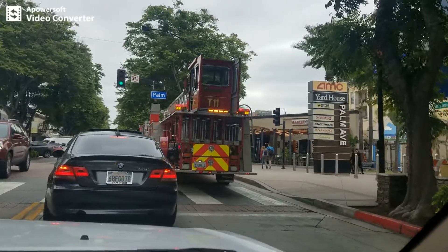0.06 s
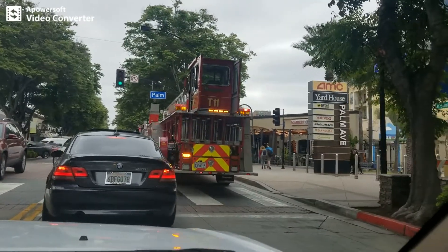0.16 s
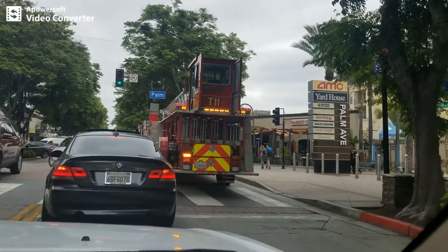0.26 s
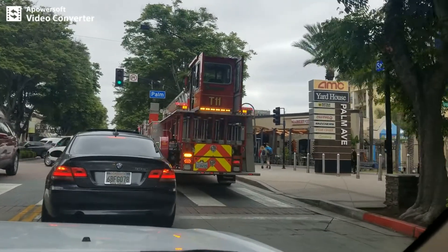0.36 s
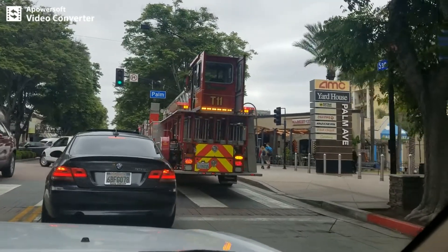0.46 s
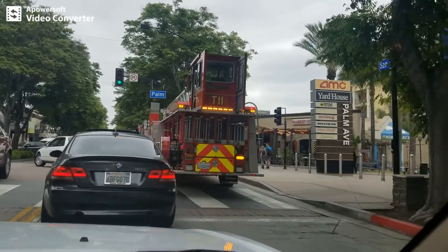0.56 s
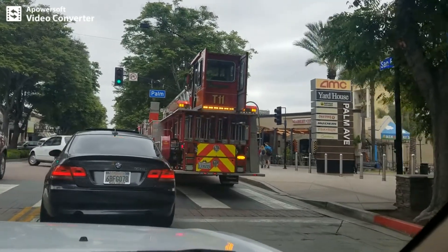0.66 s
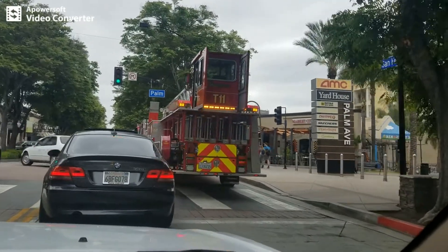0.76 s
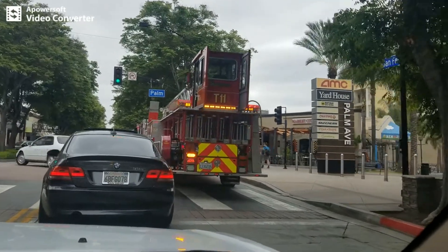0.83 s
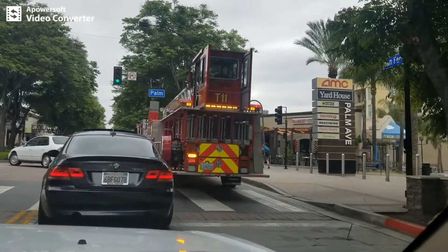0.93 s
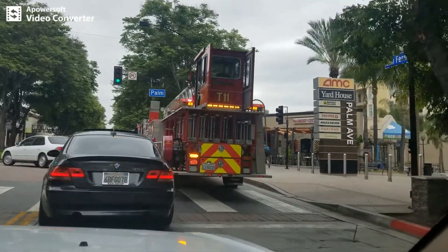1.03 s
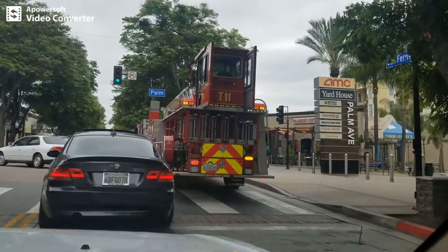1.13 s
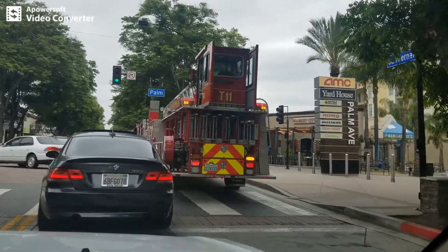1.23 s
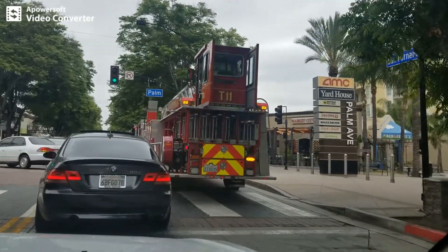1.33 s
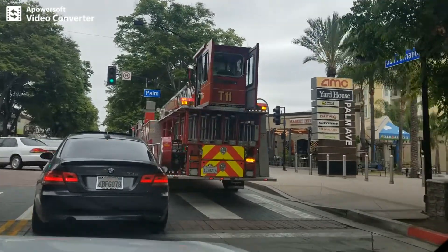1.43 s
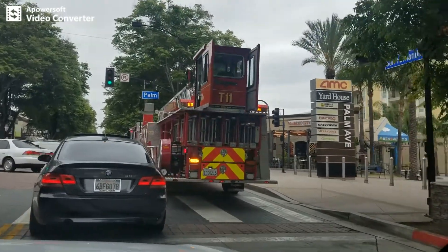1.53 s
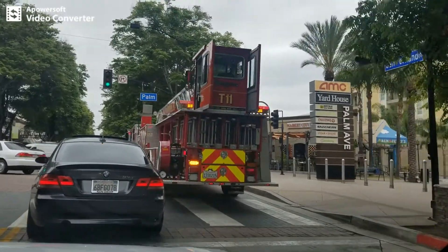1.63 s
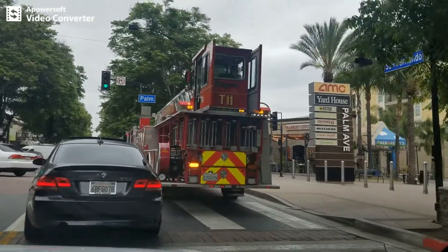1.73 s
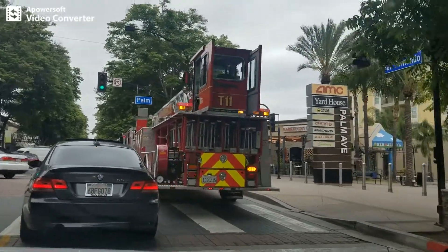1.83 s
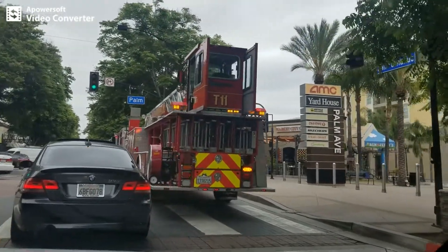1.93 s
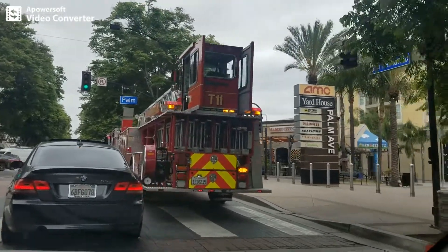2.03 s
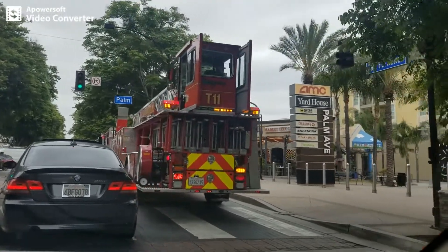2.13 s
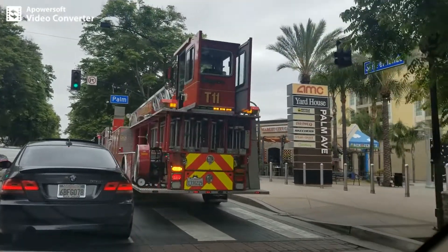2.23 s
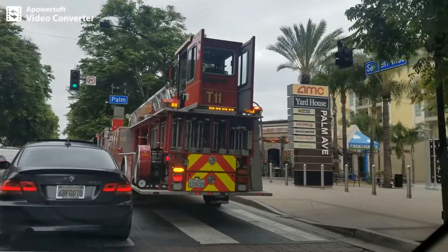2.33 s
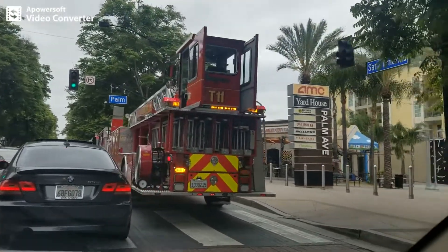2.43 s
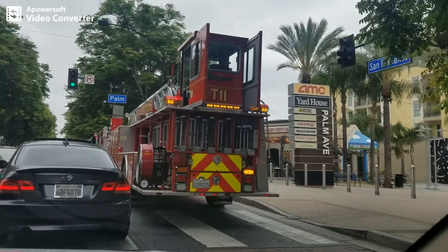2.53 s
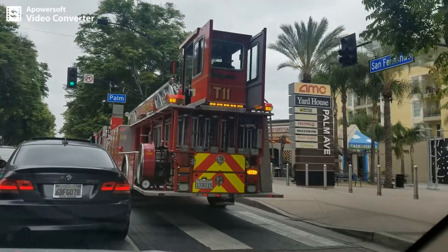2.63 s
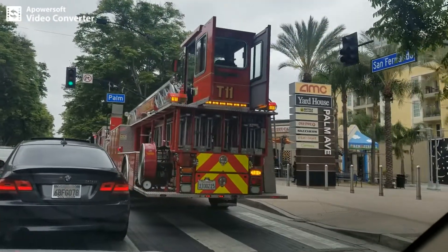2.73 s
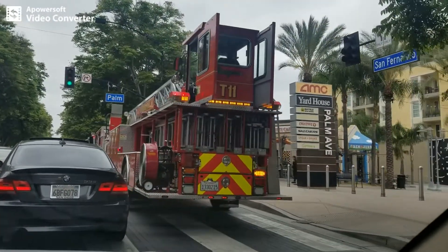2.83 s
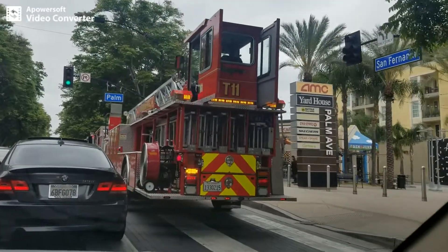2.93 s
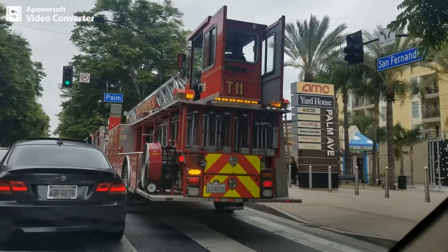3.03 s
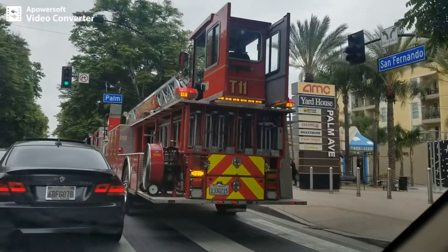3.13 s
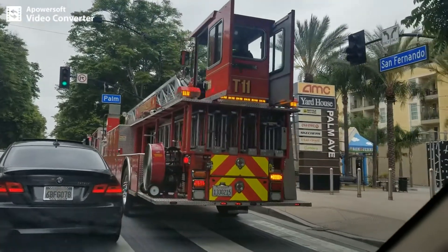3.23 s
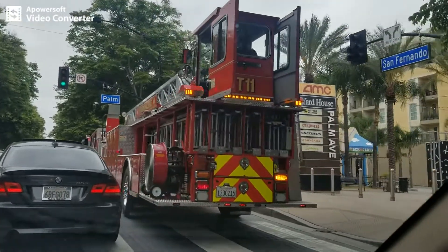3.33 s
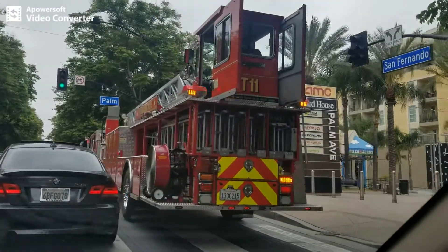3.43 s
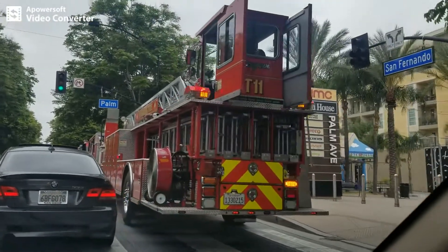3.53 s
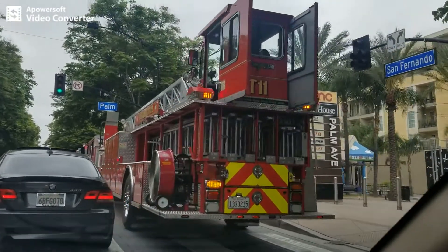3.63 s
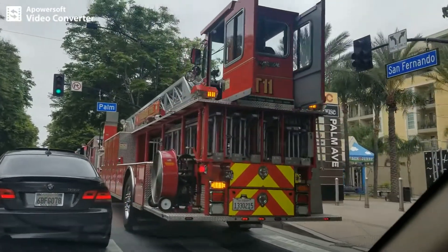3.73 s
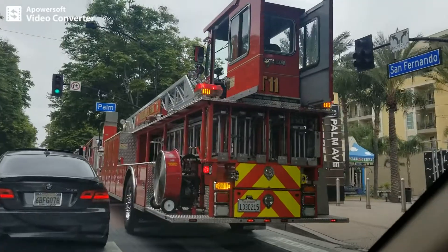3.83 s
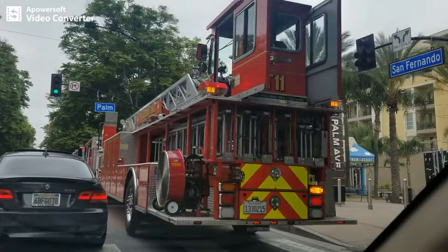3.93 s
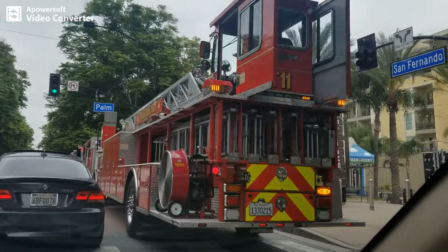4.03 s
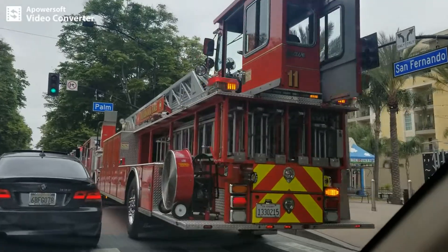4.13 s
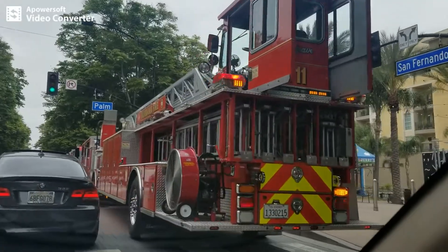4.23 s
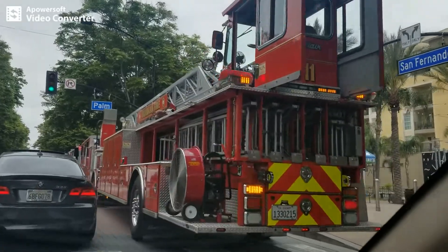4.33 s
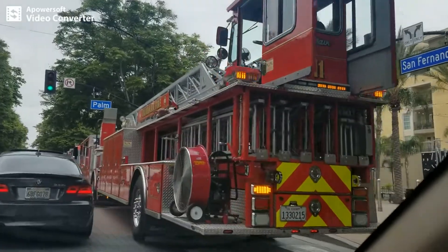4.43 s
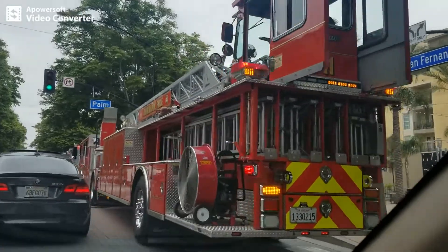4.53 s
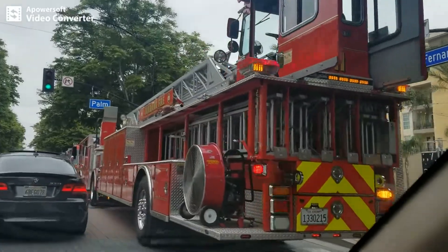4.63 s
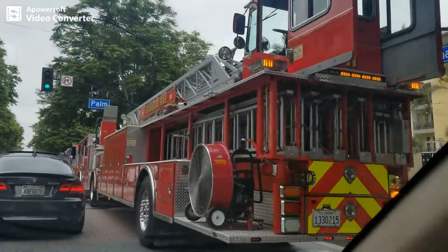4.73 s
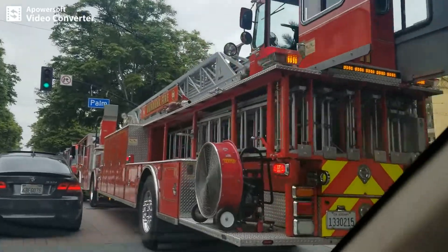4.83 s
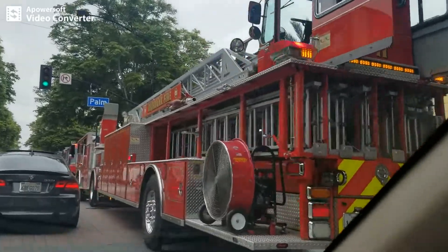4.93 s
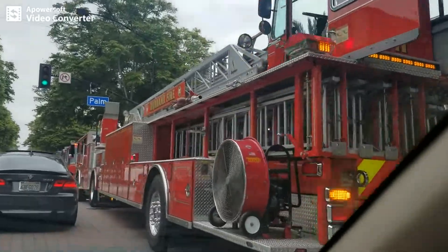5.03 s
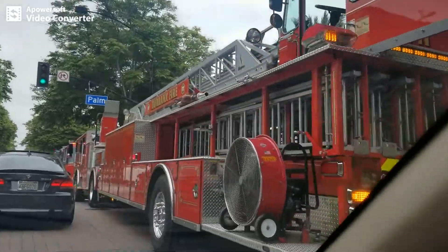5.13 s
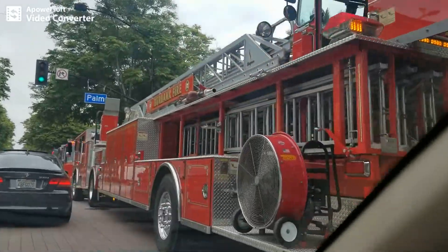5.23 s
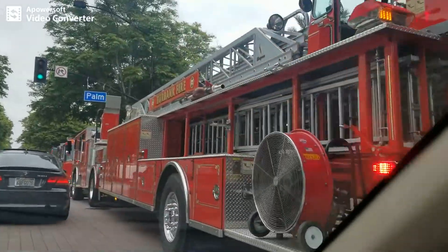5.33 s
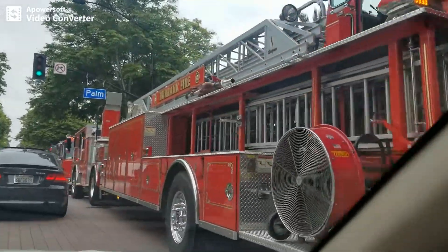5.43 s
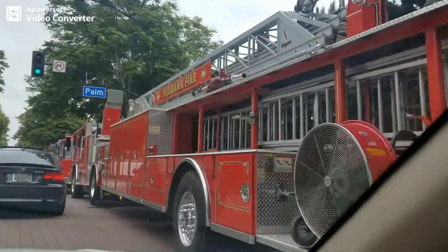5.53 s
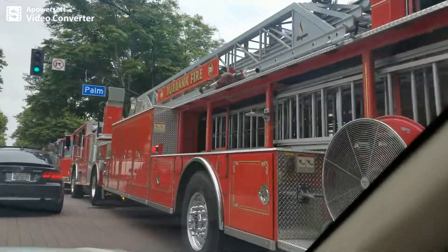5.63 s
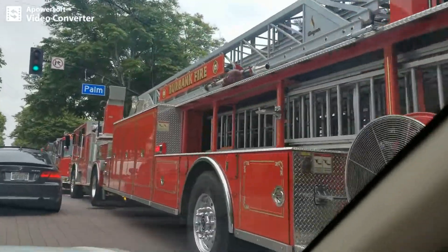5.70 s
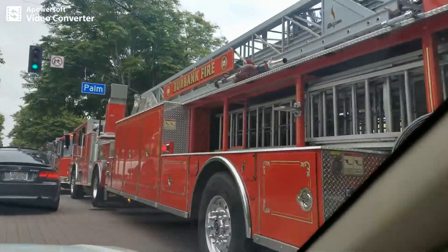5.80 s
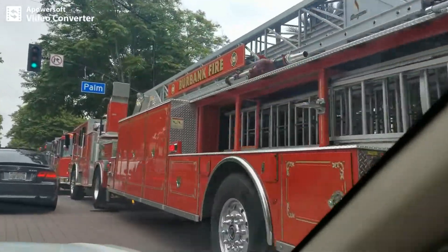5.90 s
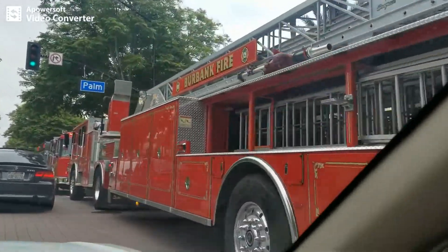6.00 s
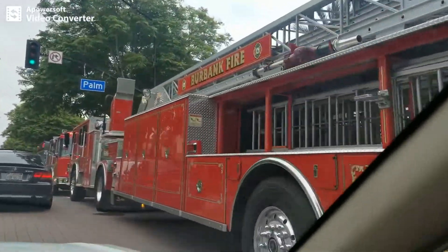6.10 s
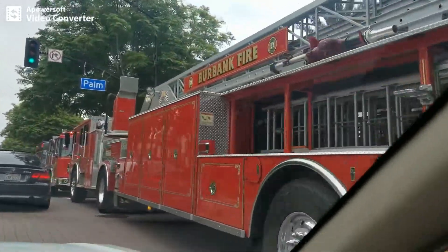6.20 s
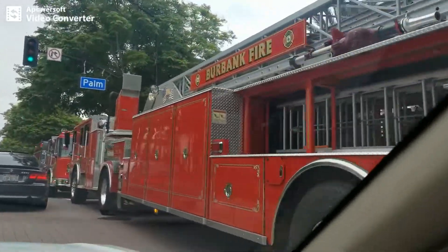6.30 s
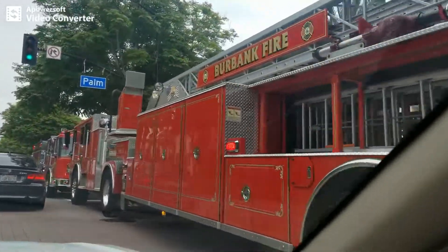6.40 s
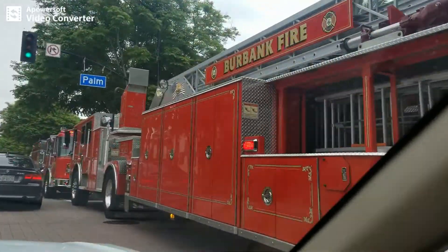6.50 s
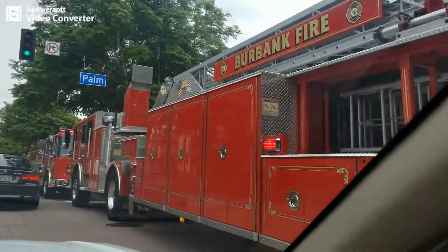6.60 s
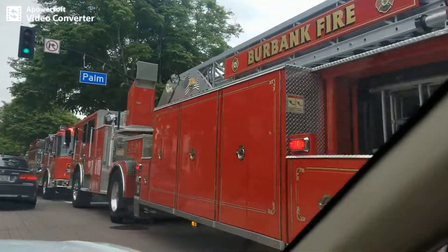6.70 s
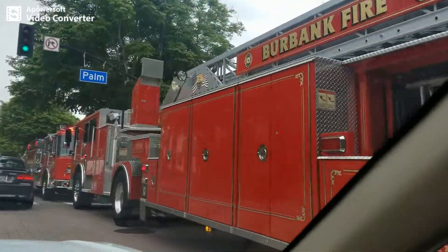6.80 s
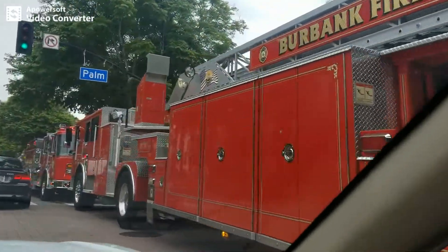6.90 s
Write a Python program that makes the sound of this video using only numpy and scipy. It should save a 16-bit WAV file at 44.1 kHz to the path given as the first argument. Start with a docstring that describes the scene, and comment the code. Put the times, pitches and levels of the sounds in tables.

```python
"""A fire truck's diesel idles ahead beside a steady hum, then pulls away with rising pitch, heard in a car.
The truck is a stack of sine orders locked to its firing rate, shaped by the closed cabin.
The car follows, its own engine a wavering tone that booms over coloured noise for road and vents.
Something loose knocks at bumps: noise bursts with decaying modes. Short noise clicks make taps and ticks."""
import sys
import numpy as np
from scipy import signal
from scipy.fft import rfft, irfft
from scipy.io import wavfile

SR = 44100
rng = np.random.default_rng(int(sys.argv[2]) if len(sys.argv) > 2 else 0)


def unload_audio(sound):
    """Save the sound as a 16-bit wav file, at the path given as the first command line argument."""
    columns = np.transpose(np.atleast_2d(sound))
    # keep every value between -1 and 1, then stretch to whole-number steps
    steps = np.round(np.clip(columns, -1, 1) * 32767)
    wavfile.write(sys.argv[1], SR, steps.astype(np.int16))


N = 306936
TIME = np.arange(N) / SR


def amp(db):
    """Decibels to gain."""
    return 10 ** (np.asarray(db) / 20)


def unit(x):
    """Scales to rms 1."""
    return x / np.sqrt(np.mean(x ** 2) + 1e-20)


def curves(rows):
    """Draws each column of a table as straight lines over time."""
    s, *columns = np.transpose(rows)
    return [np.interp(TIME, s, column) for column in columns]


def swells(rows):
    """Adds up bell-shaped rises in dB, one curve for each level column."""
    return sum(np.outer(db, np.exp(-((TIME - s) / width) ** 2)) for s, width, *db in rows)


def read(points, hz):
    """Reads a spectrum on a log-frequency axis."""
    f, value = np.transpose(points)
    return np.interp(np.log(hz + 1), np.log(f + 1), value)


def add(mix, s, sound):
    """Mixes a stereo sound in at time s."""
    part = mix[:, round(s * SR):][:, :sound.shape[1]]
    part += sound[:, :part.shape[1]]


def wander(rate_hz):
    """Slow random drift of rms 1: noise with little left above the given rate."""
    hz = np.fft.rfftfreq(N, 1 / SR)
    spectrum = rfft(rng.standard_normal(N)) / (1 + (hz / rate_hz) ** 4)
    return unit(irfft(spectrum, N))


def pan(db):
    """Left and right gains for a level difference."""
    return amp(np.array([[.5], [-.5]]) * db)


# Stereo balance of the two microphone ports. Each row: frequency in Hz, left minus right in dB.
BALANCE = [(60, -1.5), (110, -1), (200, -3), (380, -2.5), (700, 5), (1290, -1.5), (2380, 6.5), (4400, 7),
           (8120, -6), (15000, 3)]
# Stereo phase. Each row: frequency in Hz, lead of the left port in radians.
LEFT_LEAD = [(20, 0), (120, .25), (260, .45), (520, 1.3), (780, 1.6), (1210, 2.9), (1980, 5.5), (3700, 8.8),
             (5600, 16.4), (6400, 18.85)]


def ports(hz):
    """Complex gain of each port: a level and phase difference that depends on frequency."""
    return pan(read(BALANCE, hz)) * np.exp(np.array([[.5j], [-.5j]]) * read(LEFT_LEAD, hz))


def tone(turns, hz):
    """A sine as the two ports hear it; turns is its phase in cycles."""
    return np.sqrt(2) * (np.exp(2j * np.pi * turns) * ports(hz)).imag


# Stereo width of noise. Each row: frequency in Hz, likeness of the ports (1 is alike, 0 unrelated).
LIKENESS_BY_HZ = [(60, .99), (130, .98), (290, .85), (640, .5), (1400, .5), (3100, .3), (6800, .2),
                  (11000, .8), (15000, .85)]


def noise(colour, size=N):
    """Coloured noise of rms 1: a shared and an opposed part set how alike the ports are."""
    hz = np.fft.rfftfreq(size, 1 / SR)
    a, b = rfft(rng.standard_normal((2, size)))
    same = np.clip(read(LIKENESS_BY_HZ, hz), -1, 1)
    mid = a * np.sqrt(1 + same)
    side = b * np.sqrt(1 - same)
    stereo = np.array([mid + side, mid - side]) * ports(hz)
    return unit(irfft(stereo * amp(read(colour, hz)), size))


def drone(hz, db, waver_db, jitter, partials=((1, 0),)):
    """A running machine's tone: harmonic sines whose pitch and level waver together."""
    turns = np.cumsum(hz * (1 + jitter * wander(8.6))) / SR
    level = amp(db + waver_db * wander(35))
    return level * sum(amp(part_db) * tone(k * turns, k * hz) for k, part_db in partials)


# Colours of the broad hiss and the fine fizz. Each row: frequency in Hz, relative density in dB per Hz.
HISS_COLOUR = [(410, -29), (700, -3), (774, -6.5), (1100, 0), (1380, -9), (1460, -5.5), (2010, -6.5),
               (2630, -15.5), (3110, -13), (3670, -16), (4640, -16), (5730, -25), (7410, -46),
               (9150, -62.5), (10000, -43.5), (13000, -67), (22000, -120)]
FIZZ_COLOUR = [(4000, -11), (6000, -6.5), (7500, -4.5), (8500, -17.5), (10000, -12.5), (11200, -4.5),
               (12400, -1.5), (13500, -2.5), (15700, -8)]
# Swells and puffs of air. Each row: centre in seconds, width to 1/e in seconds, hiss rise in dB,
# fizz rise in dB.
AIR_SWELLS = [(0, 0.26, 1.5, 1), (2.5, .68, 3.5, 6.5), (5.35, 0.2, 1, 6), (5.7, 0.78, 3.5, 2.5),
              (5.71, .04, 3.5, 3.5), (6.93, 0.1006, 4.5, 4)]


def air(hiss_db=-60.5, fizz_db=-75, fizz_fall_db_per_s=0.86, flicker_db=0.7):
    """Vents and street hiss as noise, with a fizz on top that slowly fades; both flicker together."""
    hiss_rise, fizz_rise = swells(AIR_SWELLS) + flicker_db * wander(37)
    hiss = amp(hiss_db + hiss_rise) * noise(HISS_COLOUR)
    fizz = amp(fizz_db + fizz_rise - fizz_fall_db_per_s * TIME) * noise(FIZZ_COLOUR)
    return hiss + fizz


# The car gathers speed. Each row: time in seconds, rolling effort in dB.
ROLLING = [(0, -5.5), (1.1, -8), (2.5, -3), (5.7, 1), (6.96, 2.5)]
# Uneven road that sets the body rumbling. Each row: centre in seconds, width to 1/e in seconds, rise in dB.
ROUGH_ROAD = [(1.5, 0.73, 10), (2.55, 0.28, 13.5), (3.25, .15, 11), (4.55, 0.3, 11), (5.9, 0.16, 9.5)]
# Surges of truck load, for this noise and the growl. Each row: centre in seconds, width to 1/e in seconds,
# strength in dB.
SURGES = [(3.15, 0.21, 2.5), (4.09, 0.11, 13), (5.7, 0.087, 2.5), (6.3, 0.21, 5)]
# Colours of the deep rumble, the boom and the exhaust noise. Each row: frequency in Hz, relative
# density in dB per Hz.
RUMBLE_COLOUR = [(8, -38), (17, -30.5), (24, -4), (35, -14.5), (50, -7), (70, -9), (120, -29),
                 (300, -102.5)]
BOOM_COLOUR = [(25, 0.5), (50, 6), (70, 3), (100, 11), (140, 7.5), (170, -2.5), (220, -6.5), (300, -20),
               (600, -75)]
EXHAUST_COLOUR = [(80, -11.5), (170, 10), (280, 9), (380, 6.5), (500, 3), (650, -3.5), (900, -15),
                  (1500, -14.5), (4000, -55.5)]


def road_and_exhaust_noise(turns, rumble_db=-46, boom_db=-32.0, exhaust_db=-47.0, exhaust_per_rolling=0.21,
                           exhaust_per_surge=0.38, lumps_db=1.83, throb=0.11):
    """Tyres shake the body more with speed; exhaust noise throbs at each firing and rises with load."""
    rolling = curves(ROLLING)[0]
    rumble = amp(rumble_db + swells(ROUGH_ROAD)[0]) * noise(RUMBLE_COLOUR)
    boom = amp(boom_db + rolling) * noise(BOOM_COLOUR)
    puffs = 1 + throb * np.cos(2 * np.pi * turns)
    level_db = exhaust_db + exhaust_per_rolling * rolling + exhaust_per_surge * swells(SURGES)[0]
    exhaust = amp(level_db + lumps_db * wander(28)) * puffs * noise(EXHAUST_COLOUR)
    return rumble + boom + exhaust


# Partials of the hum. Each row: multiple of its pitch, level in dB.
HUM_PARTIALS = [(1, 0), (2, -20), (4, -25)]


def idle_hum(hz=131.2, level_db=-36.5, end_s=1.85, fade_db_per_s=42.5):
    """A steady harmonic hum beside the idling diesel, which then fades fast."""
    db = level_db - fade_db_per_s * np.maximum(TIME - end_s, 0)
    return drone(hz, db, waver_db=0.5, jitter=0.0033, partials=HUM_PARTIALS)


# The whine comes up while driving alongside. Each row: centre in seconds, width to 1/e in seconds, rise in dB.
WHINE_SWELLS = [(5.3, 1.0, 23.5), (6.92, .12, 26.5)]


def whine(hz=1478, rest_db=-87.5):
    """A single wavering sine, very faint at rest."""
    return drone(hz, rest_db + swells(WHINE_SWELLS)[0], waver_db=1.5, jitter=.002)


# The car's own engine, booming once it pulls alongside. Each row: time in seconds, firing rate in Hz,
# level in dB.
CAR = [(0, 43, -34), (1.2, 43.6, -40), (2.6, 44.8, -41), (4.2, 44.85, -54.5), (4.85, 41.6, -43.5),
       (5.1, 43.83, -23.5), (5.4, 45.89, -28), (6.6, 47, -22), (6.96, 45.2, -28.5)]
# Its partials. Each row: multiple of the firing rate, level in dB.
CAR_PARTIALS = [(1, 0), (2, -12)]


def car_engine():
    """Firing pulses heard as a low tone and its harmonic, wavering in pitch and level."""
    return drone(*curves(CAR), waver_db=2.5, jitter=.025, partials=CAR_PARTIALS)


def clicks(rows, colour, rise_s=0.00044, size=8192):
    """Small contacts: noise bursts that die quickly, without a ring."""
    t, out = np.arange(size) / SR, np.zeros((2, N))
    shape = (1 - np.exp(-t / rise_s)) * (1 - t / t[-1])
    for s, db, t60 in rows:
        add(out, s, amp(db - 60 * t / t60) * shape * noise(colour, size=size))
    return out


# Dry plastic taps, then light high ticks of trim. Each row: start in seconds, level in dB, 60 dB decay time
# in seconds before the end taper.
TAPS = [(1.125, -36, .055), (4.597, -51, .03), (6.885, -52, .04)]
TICKS = [(.37, -62, .17), (.395, -64, .2), (5.945, -66, .22)]
# Colour of the taps. Each row: frequency in Hz, relative density in dB per Hz.
TAP_COLOUR = [(300, -14), (600, 17.5), (1900, 7), (2500, -27), (3600, -18.5), (4600, -5), (6200, -14.5),
              (8000, -43), (15000, -48)]


def taps_and_ticks():
    """Plastic taps in mid-range noise; trim ticks in the same high colour as the fizz."""
    return clicks(TAPS, TAP_COLOUR) + clicks(TICKS, FIZZ_COLOUR)


# Contacts of the loose part, in quick rattles. Each row: start in seconds, clack level in dB, thud level in dB.
KNOCKS = [(1.465, -32.5, -25), (1.471, -30.5, -52), (1.480, -32, -19), (1.487, -29, -26.5),
          (1.507, -43, -19.5), (2.564, -44, -28.5), (3.798, -30.5, -20.5), (3.803, -19.5, -26),
          (3.812, -31, -17.5), (3.823, -30.5, -30), (3.841, -31, -18.5), (3.854, -36, -28)]
# Rings of the loose part and of the panel under it. Each row: frequency in Hz, level in dB, 60 dB decay time
# in seconds before the end taper.
CLACK_MODES = [(306.6, 3, 0.069), (457, -1.5, 0.033), (678, -3, 0.064), (781, -11, 0.2), (950, 1.5, 0.11),
               (1141, 10.5, 0.073), (1230, -16, .06), (1300, 6.5, 0.064), (1604, 2.5, 0.019),
               (1940, -13.5, 0.12), (2220, -11.5, 0.072), (3000, -12, 0.03), (3720, -14, 0.066),
               (5150, -12.5, 0.036), (7160, -29.5, .06)]
THUD_MODES = [(102, 1, 0.51), (203, 8.5, 0.075), (226.7, -6.5, 0.14), (275.3, -1, 0.12), (412, -12, 0.16)]
# Colours of the contact burst and its bright edge. Each row: frequency in Hz, relative density in dB per Hz.
CLACK_COLOUR = [(200, -15.5), (400, 4.5), (750, -4), (1200, 0), (1900, -4.5), (2450, -19.5), (3200, -12),
                (3900, -29), (4500, -32.5), (7000, -30.5), (10000, -49)]
CRACK_COLOUR = [(1000, -15.5), (3000, 8.5), (5500, -12), (9000, -14), (12000, -4.5), (13500, -17),
                (15800, -3)]
RATTLE_GAP_S = .1  # contacts closer than this belong to one rattle
# tilt in dB per octave: a rattle starts bright and soon dulls
FIRST_BRIGHT_DB, REBOUND_BRIGHT_DB, DULLING_S = 2, -2.5, 0.0055
# against its clack, the crack gains 0.3 dB for each dB that a contact is softer than this
HARD_KNOCK_DB, CRACK_PER_DB = -16.5, -0.3


def knocks(clack_t60=0.064, burst_db=-1, crack_db=-11, crack_t60=0.016, ring_db=-9, rise_s=0.0013,
           clack_pan_db=2.0, thud_pan_db=-2, size=8192):
    """Each contact cracks, rings the loose part's modes and thuds the panel under it."""
    t, out = np.arange(size) / SR, np.zeros((2, N))
    # tilt pivots at 1500 Hz and stays level below 400 Hz
    octaves = np.log2(np.maximum(np.fft.rfftfreq(size, 1 / SR), 400) / 1500)
    shape = (1 - np.exp(-t / rise_s)) * (1 - t / t[-1])
    panel = sum(amp(db - 60 * t / t60) * tone(hz * t, hz) for hz, db, t60 in THUD_MODES)
    thud = shape * panel / np.sqrt(8)
    for s, clack_db, thud_db in KNOCKS:
        rattle_start = min(row[0] for row in KNOCKS if row[0] > s - RATTLE_GAP_S)
        freshness = np.exp((rattle_start - s) / DULLING_S)
        bright_db = REBOUND_BRIGHT_DB + (FIRST_BRIGHT_DB - REBOUND_BRIGHT_DB) * freshness
        # each contact lands on another spot and starts the modes at other phases
        ring = sum(amp(ring_db + db - 60 * t / t60) * tone(hz * t + rng.random(), hz)
                   for hz, db, t60 in CLACK_MODES)
        burst = amp(burst_db - 60 * t / clack_t60) * noise(CLACK_COLOUR, size=size)
        edge_db = crack_db + CRACK_PER_DB * (clack_db - HARD_KNOCK_DB)
        crack = amp(edge_db - 60 * t / crack_t60) * noise(CRACK_COLOUR, size=size)
        clack = irfft(rfft((burst + crack + ring) * shape) * amp(bright_db * octaves), size)
        add(out, s, amp(clack_db) * clack * pan(clack_pan_db) + amp(thud_db) * thud * pan(thud_pan_db))
    return out


# The diesel idles, picks up, revs, dips and pulls away. Each row: time in seconds, firing rate in Hz,
# effort in dB.
THROTTLE = [(0, 35.76, -2.5), (1.2, 35.06, -3.5), (2.35, 35.3, -7.5), (2.83, 38.45, -7.5),
            (3.25, 57.25, 0.5), (3.55, 56.65, 0), (3.79, 57.93, 1.5), (4.02, 79.5, 6), (4.2, 88.54, 2),
            (4.4, 85.75, -2.5), (4.8, 92.88, 2), (5.05, 95.74, 1.5), (5.6, 105.9, 2.5), (6.3, 122, 2),
            (6.65, 124, 3), (6.8, 126.7, -6), (6.96, 129.4, -11.5)]
# The exhaust note, then the growl's lines above and between its orders. Each row: multiple of the
# firing rate, level in dB.
FIRING_ORDERS = [(1, 2.5), (2, 2), (3, 3), (4, -0.5), (5, -3)]
GROWL_ORDERS = [(1.5, 2), (2.5, -4), (3.5, -9), (4.5, -1), (6, -3), (7, -5), (8, -2), (9, -9), (10, -13)]
# What the cabin passes of the note, whose orders swell as they climb through a resonance, and of the growl.
# Each row: frequency in Hz, gain in dB.
CABIN = [(35, -47), (56, -35.5), (72, -39), (92, -32), (112, -29.5), (148, -32), (172, -50.5), (196, -40.5),
         (226, -47), (244, -45), (257, -56.5), (268, -44), (284, -49), (300, -43), (345, -52), (378, -54.5),
         (400, -64), (490, -59.5), (610, -52), (680, -64)]
GROWL_CABIN = [(150, 2), (210, -1), (250, -4), (285, 3), (330, -5), (400, -7), (460, -9), (530, -4),
               (580, -10), (750, -12), (850, -21), (1300, -32)]
GROWL_DB, GROWL_PER_EFFORT = -56, 0.1  # growl gain, and its dB per dB of effort


def diesel(flutter_db=1.8, growl_flutter_db=4.0):
    """Six cylinders fire in turn; small differences among them add lines between the firing orders."""
    hz, effort = curves(THROTTLE)
    turns = np.cumsum(hz) / SR
    note = np.zeros((2, N))
    for k, db in FIRING_ORDERS:
        level_db = effort + db + read(CABIN, k * hz) + flutter_db * wander(11)
        note += amp(level_db) * tone(round(k) * turns, k * hz)
    growl = sum(amp(read(GROWL_CABIN, k * hz) + db) * tone(k * turns + rng.random(), k * hz)
                for k, db in GROWL_ORDERS)
    load_db = GROWL_DB + GROWL_PER_EFFORT * effort + swells(SURGES)[0]
    return note + growl * amp(load_db + growl_flutter_db * wander(2.7)), turns


def scene():
    """Truck, car, road and cabin together."""
    truck, turns = diesel()
    background = air() + road_and_exhaust_noise(turns)
    machines = idle_hum() + whine() + car_engine()
    cabin = taps_and_ticks() + knocks()
    return background + machines + cabin + truck


def record(dry):
    """The recorder's band limit: a steep low-pass at 15.8 kHz, with soft ends."""
    ends = signal.windows.tukey(N, .002)
    lowpass = signal.firwin(511, 15800, window=("kaiser", 9), fs=SR)
    return signal.oaconvolve(dry * ends, lowpass[None], "same")


dry = scene()
out = record(dry)
unload_audio(out)
```